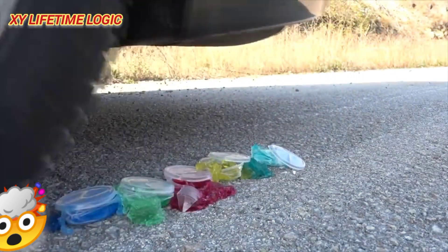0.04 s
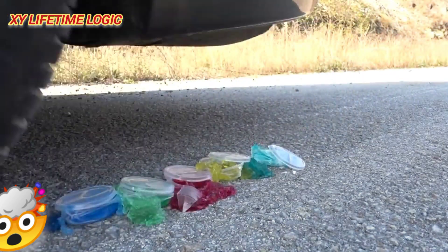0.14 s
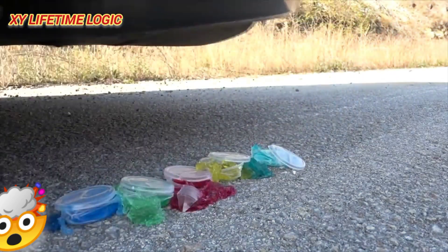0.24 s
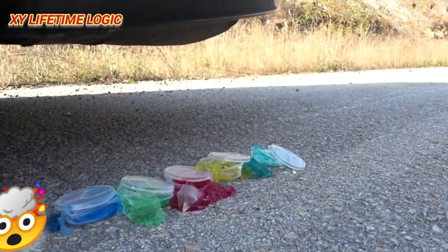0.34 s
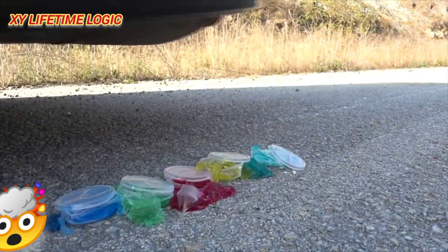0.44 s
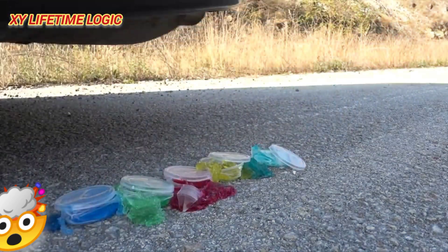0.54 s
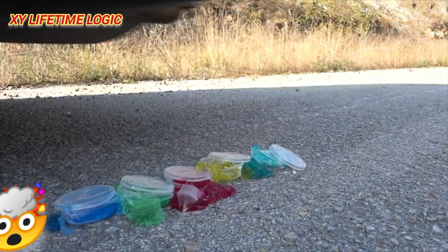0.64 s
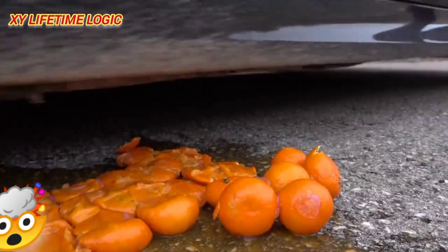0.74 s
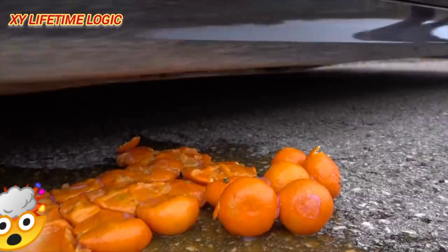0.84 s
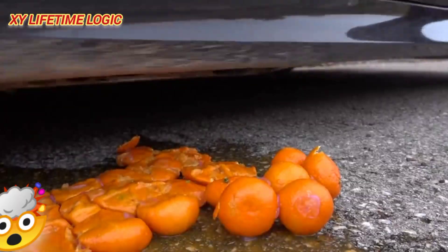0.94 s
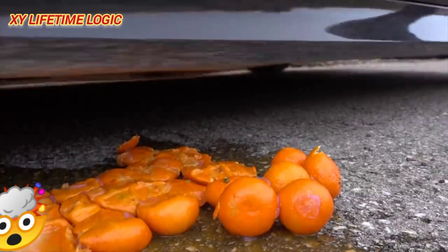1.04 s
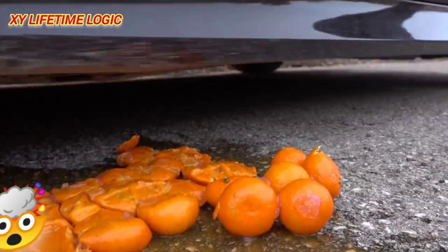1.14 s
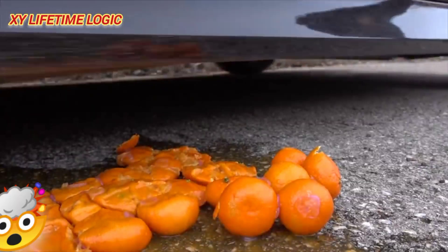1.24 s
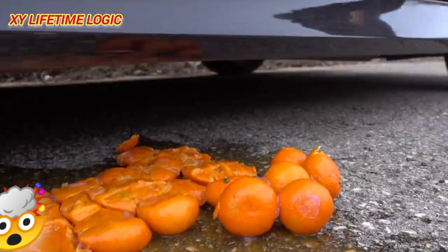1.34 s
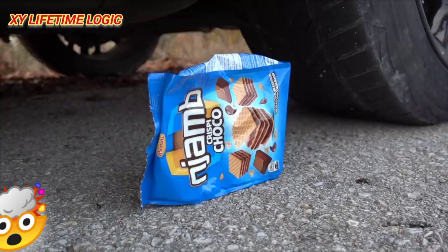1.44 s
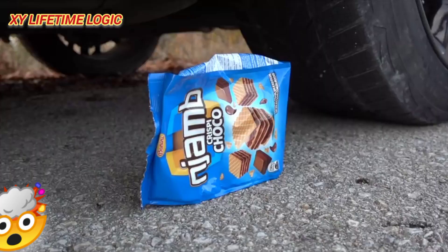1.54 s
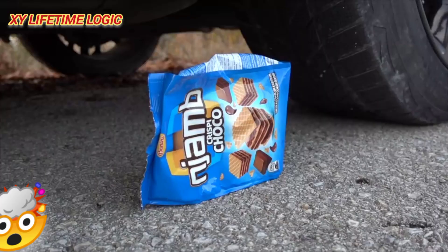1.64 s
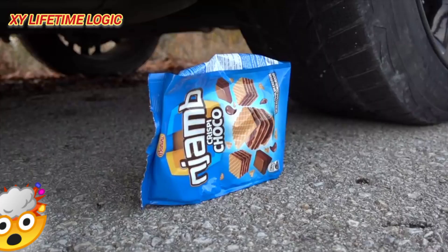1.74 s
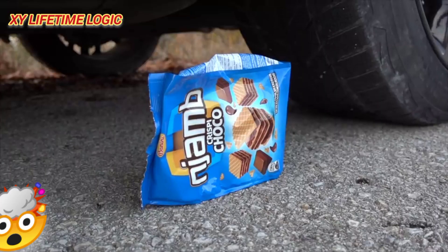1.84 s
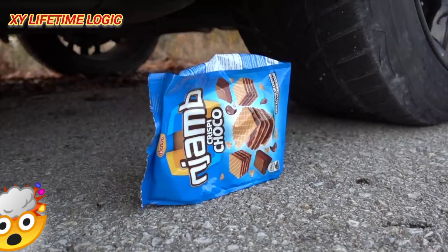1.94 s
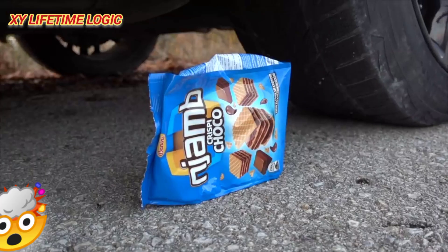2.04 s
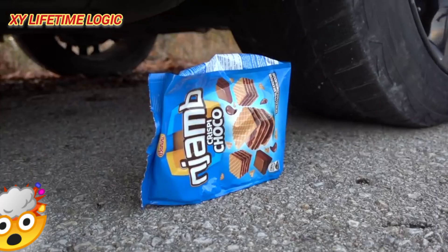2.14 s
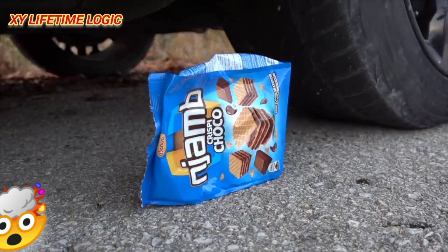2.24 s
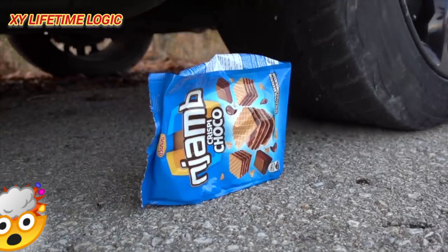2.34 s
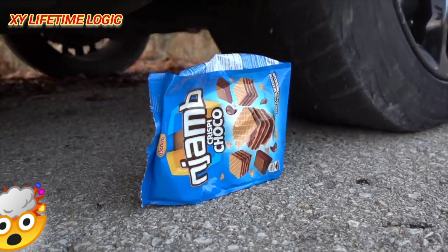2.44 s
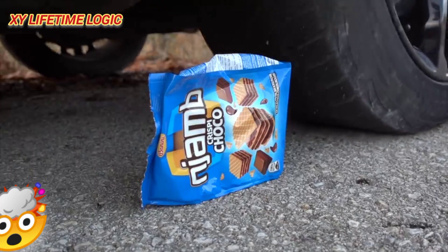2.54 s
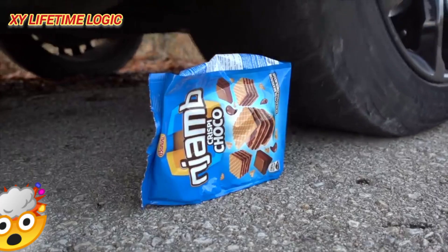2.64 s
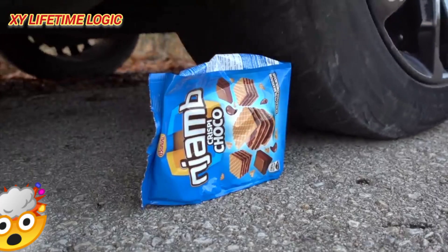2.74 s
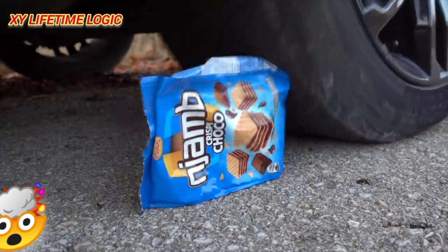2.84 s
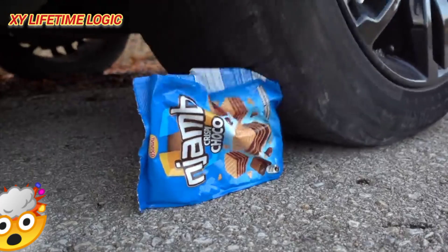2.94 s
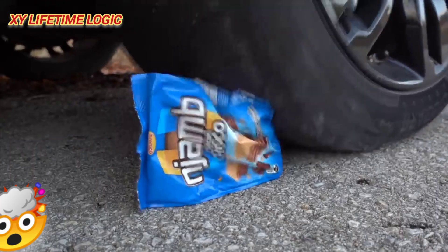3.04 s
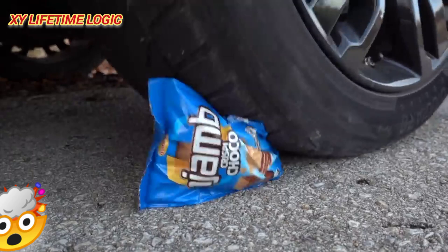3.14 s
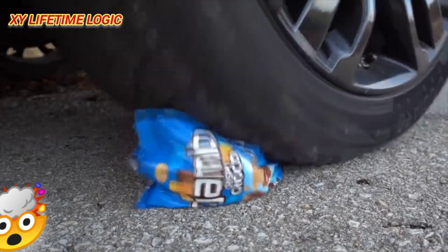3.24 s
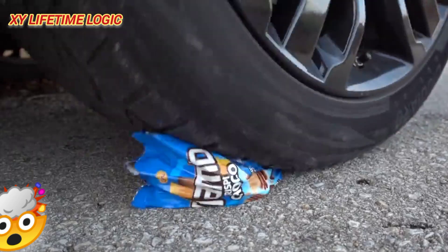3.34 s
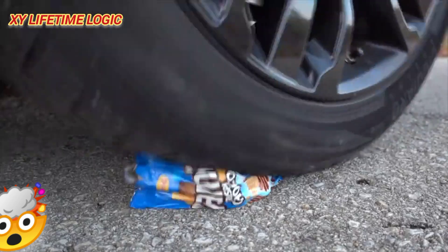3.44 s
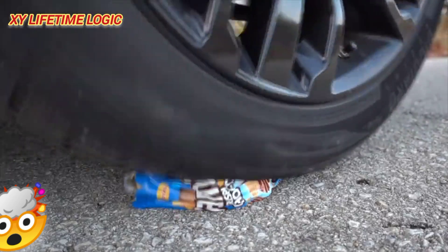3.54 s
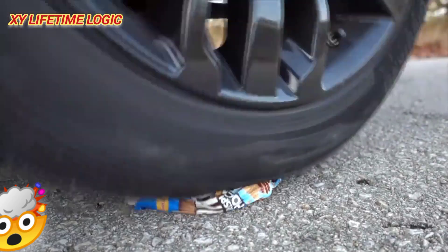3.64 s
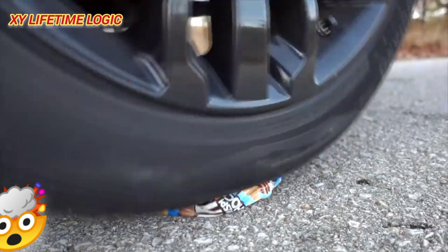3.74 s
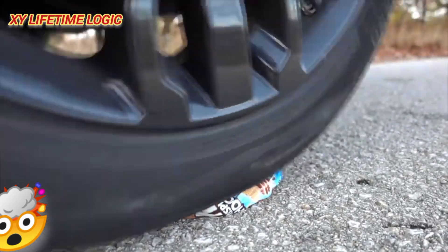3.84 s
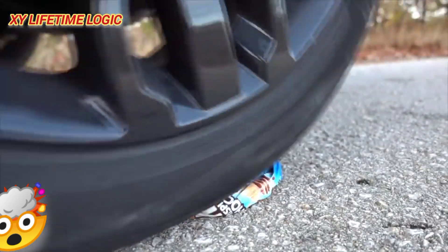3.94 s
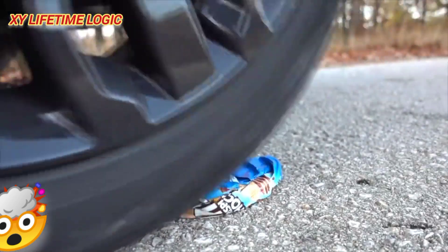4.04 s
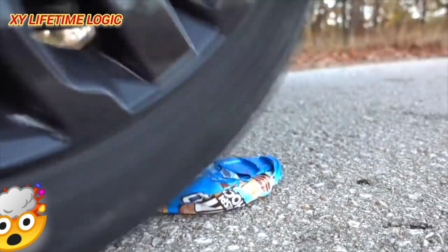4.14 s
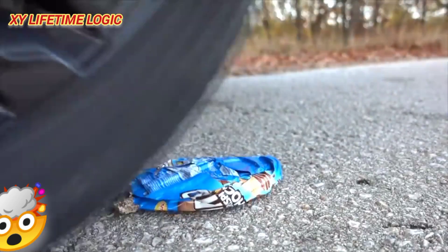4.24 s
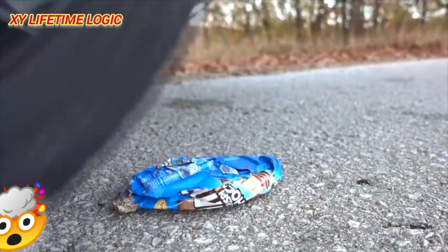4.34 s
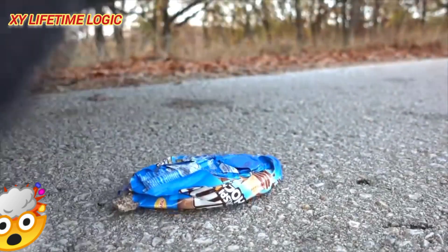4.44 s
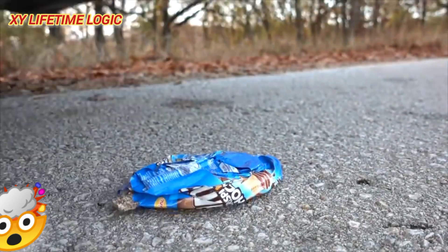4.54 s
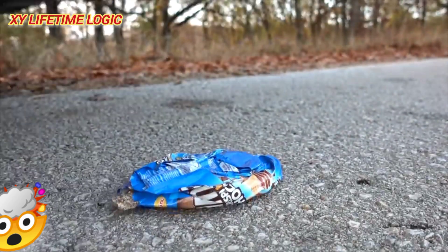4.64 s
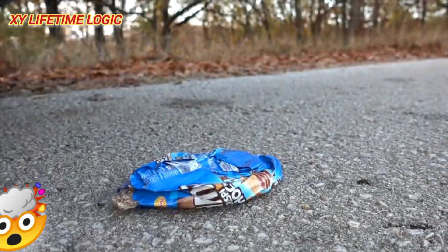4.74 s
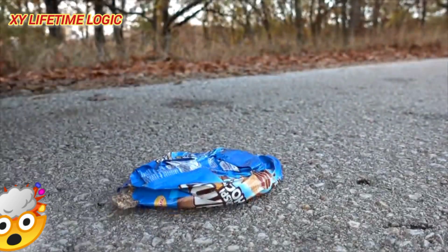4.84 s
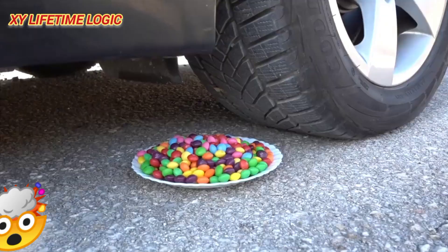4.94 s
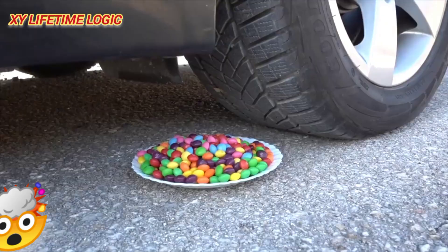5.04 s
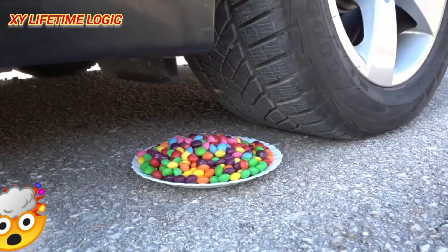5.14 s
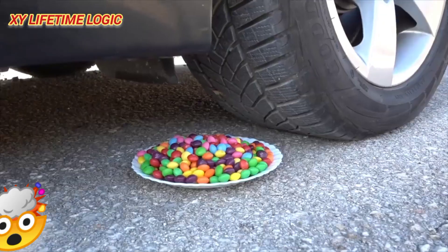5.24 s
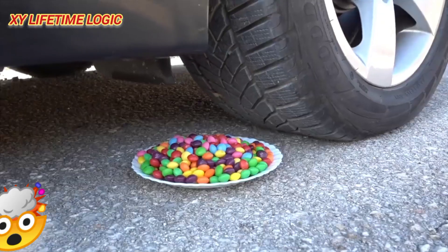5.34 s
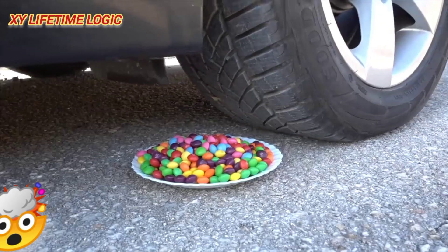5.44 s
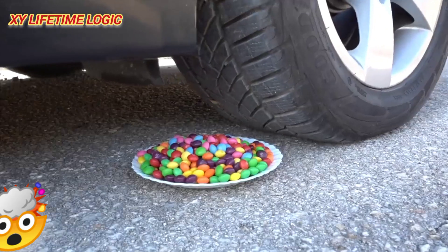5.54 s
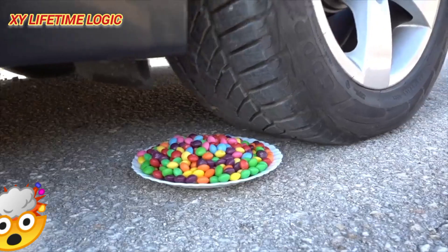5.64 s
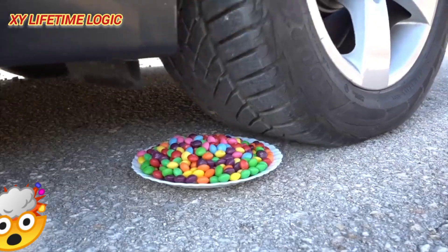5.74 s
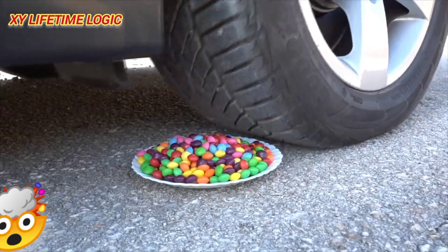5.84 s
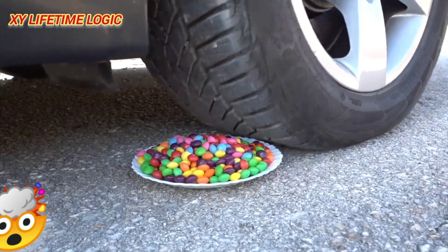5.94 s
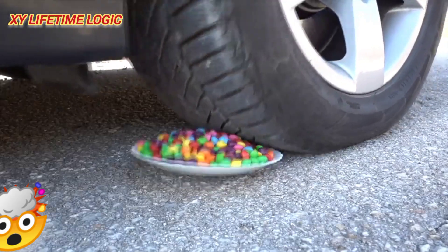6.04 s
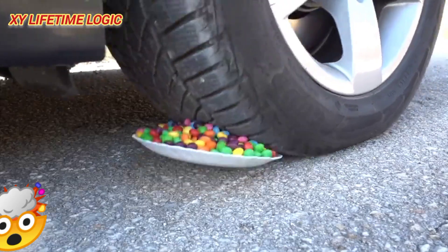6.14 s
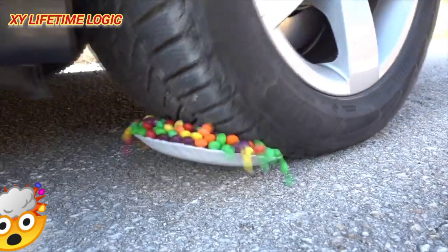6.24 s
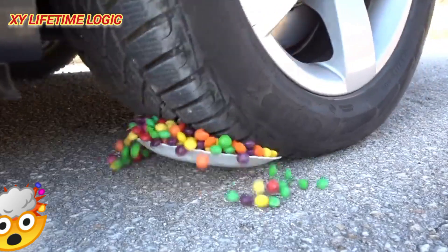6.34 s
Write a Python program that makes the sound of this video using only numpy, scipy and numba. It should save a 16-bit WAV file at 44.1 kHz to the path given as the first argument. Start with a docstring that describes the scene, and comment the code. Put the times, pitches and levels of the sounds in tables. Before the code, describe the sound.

Close to the road, slow tyres creep over grit, brakes scrape and groan, a crisp wafer bag is crushed, its film crackles, and candies burst.

```python
"""A car creeps over small objects on coarse asphalt, heard from the ground.
Tyres grind grit (banded noise) and pop stones (damped tyre modes); the brake lets go with a scrape
(swelling noise) and a groan (gliding sines). A wafer bag is crushed and its film crackles open again
(grainy noise, short rings, ticks). The brake lets go once more, the tyres roll on, and a plate of
sweets starts to shatter, made like the bag."""
import sys
import numpy as np
from scipy import signal
from scipy.fft import rfft, irfft, next_fast_len
from scipy.io import wavfile
from scipy.ndimage import uniform_filter1d
from numba import njit

SR = 44100
rng = np.random.default_rng(int(sys.argv[2]) if len(sys.argv) > 2 else 0)


def pcm_store(signal):
    """Save signal as 16-bit PCM."""
    levels = np.round(np.clip(np.atleast_2d(signal), -1, 1) * 32767)
    wavfile.write(sys.argv[1], SR, levels.astype(np.int16).T)


def attenuation_scalar(level_db):
    """Turn a level in dB into a linear amplitude multiplier (20 dB per decade)."""
    decades = np.asarray(level_db, float) / 20
    return 10 ** decades


N = 282240
TOP_HZ = 15600

# rumble, grind and hiss bands: low_hz, high_hz
BANDS_HZ = [(40, 250), (300, 2500), (4000, 15000)]
# tyre and crush position: time_s, left_minus_right_db
PAN = [(0, 2.5), (.4, 8.5), (.9, 13.5), (1.5, 10.5), (1.85, 14.5), (2.3, 9.5), (2.8, 9.5), (2.9, 3),
       (3.8, 2), (4.05, 7.5), (4.35, 6), (4.9, 12), (5.06, -2), (5.13, -0.5), (5.3, 11.5), (5.9, 6),
       (6.2, 0.5), (6.4, -0.5)]
# phase between the two microphone ports: freq_hz, left_lead_rad
PORT_PHASE = [(30, 0.37), (500, -0.29), (1400, -0.54), (3400, -.01)]
# stretches of rolling: start_s, end_s
ROLL_SPANS_S = [(0, .695), (.695, 1.535), (1.535, 1.81), (1.81, 2.859), (4.947, 5.1), (5.1, 6.18)]
# tyres on grit, one table per stretch: time_s, rumble_db, grind_db, hiss_db
ROLL_LEVELS = [
    [(0.015, -55, -43.5, -60), (0.23, -52.5, -45, -65), (0.5, -53.5, -46.5, -61.5),
     (0.68, -48, -42.5, -60.5)],
    [(0.71, -47, -48.5, -49.5), (0.88, -41.5, -43.5, -48.5), (1.13, -43.5, -47, -56.5),
     (1.316, -43.5, -43, -54), (1.5, -41, -37, -54)],
    [(1.555, -65, -58, -76), (1.7, -48, -69, -64)],
    [(1.92, -62, -48, -63.5), (2.04, -53.5, -53.5, -77), (2.23, -60, -48.5, -77), (2.46, -61.5, -46.5, -69),
     (2.84, -62.5, -40, -58.5)],
    [(4.965, -66, -74, -88), (5.04, -73, -65, -83.5)],
    [(5.31, -45.5, -61.5, -84), (5.566, -60.5, -70, -81), (5.9, -69.5, -60, -82.5),
     (6.11, -61.5, -52.5, -69), (6.17, -58, -57, -52)],
]
# tyre noise spectrum, one table per stretch: freq_hz, density_db_per_hz
ROAD_SPECTRA = [
    [(18, -55), (30, -32), (81, -13.5), (332, -20), (591, -21.5), (639, -18), (787, -23), (1400, -14.5),
     (13300, -19.5), (15500, -37)],
    [(18, -41), (30, -12.5), (237, -6.5), (656, -9.5), (1290, -9.5), (2620, -19), (3400, -18), (5170, -28),
     (12300, -30.5), (15500, -35)],
    [(18, -73), (30, -46), (256, -7), (324, -25), (399, -0.5), (575, -12), (3320, -31), (3880, -30),
     (15500, -41)],
    [(18, -37.5), (30, -10), (92, 7), (152, -1), (420, -4), (830, -17), (1170, -19.5), (1720, -21.5),
     (11900, -26), (15500, -35)],
    [(18, -28), (30, -15), (168, -6), (1720, -20), (2490, -6), (3400, -31), (5040, -23), (5890, -29),
     (15500, -26)],
    [(18, -40), (30, -23), (66, -12.5), (177, -15), (230, -8), (1230, -16.5), (1550, -16), (1680, -21.5),
     (1820, -18.5), (2250, -22), (2650, -18), (3000, -32.5), (15500, -58)],
]
# brake pads scraping free: loudest_s, grind_db, swell_db_per_s, hiss_db, rumble_db
BRAKE_SCRAPES = [(1.812, -35, 155, -58, -37), (5.1, -34.5, 529, -48.5, -34.5)]
# pad noise spectrum, one table per scrape: freq_hz, density_db_per_hz
PAD_SPECTRA = [
    [(18, -56), (30, -36), (123, -12), (213, -26), (324, -7.5), (575, -20.5), (691, -10.5), (1140, -21.5),
     (2990, -5.5), (15500, -15)],
    [(18, -51), (30, -30), (359, -9), (432, -2.5), (1050, -5.5), (1260, -2.5), (3680, -8.5), (10500, -28),
     (11900, -77), (15500, -42)],
]
# pad squeaks and body groans: start_s, level_db, start_hz, end_hz, rise_s, t60_s
GROANS = [(1.704, -35, 130, 121, 0.0052, 0.094), (1.725, -47, 1500, 1500, .02, .1),
          (1.791, -35, 379, 339, 0.052, 0.14), (1.82, -42.5, 1450, 1450, 0.018, 0.15),
          (1.848, -33.5, 330, 128.5, 0.0082, 0.29), (1.901, -49.5, 395, 384.5, 0.048, 1.3),
          (5.078, -34, 470, 440, .008, .12), (5.114, -26, 266, 140.6, 0.028, 0.1),
          (5.224, -36.5, 151, 132, 0.01, 0.53)]
# tyre and wheel arch modes: mode_hz, level_db, relative_ring_time
TYRE_MODES = [(237.4, -6, 1.44), (330, -9, 3.3), (461, -0.5, 1.14), (541, 1, 0.88), (664, 4, 0.65),
              (789, 1, 0.48), (904, 4, 0.92), (1074, 4.5, 0.39), (1214, 0.5, 0.69), (1450, 7.5, 0.35),
              (1624, -3, .8), (1963, -5, 2.1), (2350, -11.5, 0.85), (2610, -5, 1.95), (2900, 0.5, 0.62),
              (3490, -13.5, 0.58), (3850, -7.5, 1), (4160, -9.5, 0.36)]
# stones and lumps popping under the tread: start_s, level_db, centre_hz, thud_db, crack_db
KNOCKS = [(0.041, -28, 620, -2.5, -9), (0.18, -27.5, 611, -28, 4.5), (0.453, -25, 487, -17, -16),
          (0.569, -25.5, 1620, -33, -26), (0.585, -31.5, 930, -18, -15), (0.607, -30.5, 2330, -7, -5.5),
          (0.753, -16.5, 910, 2, -8.5), (0.793, -16.5, 886, 2, 1), (1.116, -32.5, 415, 6.5, -6),
          (1.174, -33, 1510, -16, -18), (1.23, -18.5, 1590, -4, -24), (1.249, -33, 420, -1, -6),
          (1.345, -35, 401, -16, -13), (1.645, -43, 524, -20, -8.5), (2.123, -42, 423, -24, -12.5),
          (2.247, -33, 643, -32, -15), (2.333, -20, 704, -36, -21), (2.406, -38, 681, 2, -19),
          (2.466, -29, 587, -27, -20), (2.596, -39.5, 535, -23, -8), (2.613, -38, 444, -15, -6.5),
          (2.672, -41, 697, -20, -11), (2.75, -28, 860, -18, -28), (2.757, -30.5, 980, -17, -24),
          (2.797, -43, 452, -24, -5), (2.865, -28.5, 956, 3, -2), (3.077, -16, 697, -30, -17),
          (3.11, -19.5, 554, -27, -1), (3.188, -20.5, 1310, -18.5, -23), (3.209, -14, 506, -26, -10),
          (3.264, -16.5, 1640, -25, 1), (3.282, -12.5, 525, -25, -15), (3.325, -10, 517, -7.5, -9),
          (3.4, -16, 650, -28, -14), (3.481, -14, 1530, -12, -21), (3.855, -12, 870, -16, -33),
          (4.0505, -11.5, 660, -45, -35), (4.573, -31.5, 1590, -9, -11), (4.691, -31, 900, -17, 0),
          (5.048, -50, 1700, -20, -8), (5.188, -44, 3000, -20, 0), (5.815, -44.5, 470, -5, -9),
          (5.953, -53, 458, 10, -16), (6.113, -42.5, 1000, -21, 6)]
# spectra of bag, film and sweets: freq_hz, density_db_per_hz
SHARD_SPECTRA = [
    [(18, -48.5), (30, -36), (88, -11), (197, -4.5), (237, -6), (277, -3.5), (546, -3.5), (1170, -9.5),
     (1290, -6), (1720, -7), (2990, -2), (11000, -1.5), (15500, -4)],
    [(18, -44), (30, -5), (177, 4.5), (359, -3), (673, -3.5), (767, -6), (852, -1), (945, -8), (3230, -4),
     (3490, -5), (13600, -4), (15500, -5)],
    [(18, -58), (30, -23), (187, -13), (243, -3), (341, -18), (656, -4), (897, -16.5), (1170, -0.5),
     (1440, -10), (6720, -4.5), (15500, -15.5)],
]
# bag being crushed: time_s, rumble_db, grind_db, hiss_db
BAG_LEVELS = [(2.87, -37, -26.5, -29.5), (2.93, -43.5, -28, -24.5), (3.06, -40, -27, -24.5),
              (3.25, -47, -18.5, -22), (3.34, -30.5, -23, -25.5), (3.42, -44, -24.5, -23),
              (3.55, -49.5, -29.5, -25), (3.8, -53, -32, -26), (3.9, -47, -41, -33),
              (3.98, -59, -32.5, -32.5), (4.029, -52, -37, -42)]
# film unfolding: time_s, rumble_db, grind_db, hiss_db
FILM_LEVELS = [(4.031, -55, -38, -44.5), (4.14, -50.5, -42, -49), (4.35, -52.5, -40.5, -43.5),
               (4.5, -50.5, -44.5, -46), (4.62, -50, -42.5, -51.5), (4.76, -49, -35, -53.5),
               (4.934, -48.5, -35.5, -52.5)]
# sweets breaking: time_s, rumble_db, grind_db, hiss_db
SWEETS_LEVELS = [(6.18, -55, -45, -52), (6.192, -55, -42, -47), (6.198, -52, -37, -32),
                 (6.216, -45, -35, -29.5), (6.226, -48, -32.5, -23.5), (6.25, -46.5, -31, -18),
                 (6.33, -51, -27, -20.5), (6.37, -50, -33, -20.5), (6.383, -58, -36, -25),
                 (6.4, -53, -38, -25.5)]
# clearest brittle snaps: start_s, level_db, centre_hz, left_minus_right_db
SNAPS = [(0.0064, -19.5, 1570, 4), (0.3128, -14.5, 4720, 3.5), (0.4981, -10, 7630, 8),
         (0.5695, -32, 2480, 5), (0.6462, -26.5, 2580, 6), (1.2315, -24, 1940, 9), (2.334, -37, 1420, 3),
         (0.6958, -36, 2080, 2), (2.599, -41, 1700, 23), (2.797, -34, 1520, 9), (2.8629, -10, 4730, 6),
         (2.9504, -10, 2800, 1), (3.0354, -2.5, 3270, -3), (3.0594, -11, 4000, -3), (3.0769, -8, 3500, -4),
         (3.1325, 0.5, 2550, 1), (3.5263, -9, 3400, 4), (3.5566, -9, 7100, 2), (3.582, -3, 5540, 3),
         (3.6044, -12, 6500, -1), (3.7978, -6, 9100, -2), (3.7757, -12, 2500, 0), (3.8062, -21, 3000, -1),
         (3.8331, -21, 4690, 2), (3.882, -6, 2687, -2), (3.928, -4.5, 1880, -3), (3.9614, -21, 5100, 0),
         (3.9788, -12.5, 2110, -4), (4.0978, -13, 2970, 4), (4.1296, -25, 2460, -4),
         (4.1608, -14.5, 4320, 2), (4.174, -14.5, 3530, -1), (4.2116, -19, 3700, 2),
         (4.2288, -18.5, 2410, -1), (4.2721, -6, 4700, 2.5), (4.3012, -23, 7070, 1.5),
         (4.3127, -20, 4380, -3), (4.3438, -10.5, 3760, 1), (4.3743, -7, 4680, 3.5),
         (4.4135, -15.5, 3430, 6), (4.5167, -30, 10800, -1), (4.5811, -22, 4760, 6),
         (4.5541, -17.5, 2900, 9), (4.5903, -21, 4430, -14), (4.615, -25, 2900, -6),
         (4.626, -22.5, 2060, 7), (4.6522, -19, 3280, 5), (4.6629, -19.5, 3880, 6), (4.689, -11.5, 2130, 6),
         (4.7278, -20, 3000, 10), (4.738, -25, 8000, 3), (4.7895, -15.5, 4500, 19), (4.8127, -7, 3380, 5),
         (4.835, -22, 3200, 8), (4.9047, -14, 4500, 6.5), (4.938, -24.5, 7700, 12),
         (6.0207, -35.5, 8000, 4), (6.098, -22.5, 3250, 1), (6.1304, -26, 4500, -2),
         (6.139, -17.5, 5150, -5), (6.2053, -8.5, 6720, -1), (6.2485, -5, 7250, 3), (6.2803, -2, 7100, 0.5),
         (6.327, -2, 5460, -2), (6.3356, 0, 6000, 0), (6.3648, -2, 5010, 2), (6.3891, 1.5, 7600, 0)]


def on_log_hz(table, hz):
    """Second column of a table at hz, interpolated over log frequency."""
    table_hz, value = np.transpose(table)
    return np.interp(np.log(np.maximum(hz, 1)), np.log(table_hz), value)


def tyre_pan(s):
    """Left minus right dB at the tyre at time s."""
    return np.interp(s, *np.transpose(PAN))


def sides(pan_db, hz):
    """Left and right gains; bass and top treble reach both ports alike."""
    db = pan_db * np.clip(hz / 1700.0, 0, 1) * np.clip(1.5 - hz / 6400.0, 0, 1) / 2
    return attenuation_scalar(db), attenuation_scalar(-db)


@njit
def ring(count, start, hz, t60, rise, left, right):
    """Sum of damped sines that swell over the contact time, each dropped at -60 dB."""
    out = np.zeros((2, count))
    for k in range(len(start)):
        turn = np.exp(2j * np.pi * hz[k] / SR - np.log(1000.) / (t60[k] * SR))
        z, gap, close = 1 + 0j, 1., np.exp(-1 / (rise[k] * SR))
        for i in range(start[k], min(count, start[k] + int(t60[k] * SR) + 2)):
            v = z.imag * (1 - gap) ** 2
            out[0, i] += left[k] * v
            out[1, i] += right[k] * v
            z *= turn
            gap *= close
    return out


def ring_panned(s, hz, t60_s, rise_s, size, pan_db):
    """Damped sines of any array shape, placed left to right."""
    left, right = sides(pan_db, hz)
    start = (s * SR).astype(np.int64)
    return ring(N, start.ravel(), hz.ravel(), t60_s.ravel(), rise_s.ravel(),
                (size * left).ravel(), (size * right).ravel())


def walk(n, rate_hz):
    """Random levels held 1 / rate_hz and slewed; spread near 1."""
    k = max(int(SR / rate_hz), 1)
    held = np.repeat(rng.standard_normal(n // k + 1), k)
    return 1.05 * uniform_filter1d(held, k)[:n]


def clatter(n, rate_hz, spread_db, tail_s):
    """Power envelope of random little breaks with sharp starts and short tails, mean 1."""
    chance = rng.random((2, n))
    kicks = (chance[0] < rate_hz / SR) * attenuation_scalar(-2 * spread_db * np.log(1 - chance[1]))
    power = signal.lfilter([1], [1, -np.exp(-1 / (tail_s * SR))], kicks) + 1e-18
    return power / power.mean()


def stretch(span_s, levels, spectrum, grit, rate_hz, spread_db, flicker_db, wide_hz):
    """Half-octave noise, part smooth, part grains (share: grit); three levels bend the spectrum."""
    s, *columns = np.transpose(levels)
    i0, i1 = int(span_s[0] * SR), min(int(span_s[1] * SR), N)
    n, size = i1 - i0, next_fast_len(i1 - i0)
    t = np.arange(i0, i1) / SR
    pan_db = tyre_pan(t)
    f = np.arange(size // 2 + 1) * SR / size
    shape = attenuation_scalar(on_log_hz(spectrum, f))
    bend_db = []
    for column, (lo, hi) in zip(columns, BANDS_HZ):
        power = np.sum(shape[(f > lo) & (f < hi)] ** 2) / len(f)
        bend_db.append(np.interp(t, s, column) - 10 * np.log10(power))
    whole, swell = clatter(n, rate_hz, spread_db, 0.00066), walk(n, 24.37)
    out = np.zeros((2, N))
    for hz in 30 * 2 ** np.arange(0, 9.6, .5):
        window = np.cos(np.pi * np.clip(np.log2(np.maximum(f, 1) / hz), -.5, .5))
        noise = rfft(rng.standard_normal((2, size)))
        mid, side = irfft(noise * shape * window, size)[:, :n]
        place = np.interp(np.log(hz), np.log([130, 900, 7000]), [0, 1, 2])
        db = sum(max(1 - abs(place - k), 0) * bend_db[k] for k in range(3))
        # some breaks cover all pitches, some ring at one pitch for a few cycles
        grains = .5 * whole + .5 * clatter(n, rate_hz / 2, spread_db, 1.5 / hz + 0.0016)
        grains = uniform_filter1d(grains, int(SR / hz) + 1)
        flicker = flicker_db * (swell + walk(n, 40.25))
        gain = attenuation_scalar(db + flicker) * np.sqrt(1 - grit + grit * grains)
        wide = min(.04 + hz / wide_hz, .74)
        left, right = sides(pan_db, hz)
        out[0, i0:i1] += gain * left * (mid + wide * side)
        out[1, i0:i1] += gain * right * (mid - wide * side)
    return out


def underbody(x, wet_db, t60_s):
    """Small sources radiate little deep bass; short scatter between road and car floor follows."""
    x = signal.sosfilt(signal.butter(2, 150., "high", fs=SR, output="sos"), x)
    t = np.arange(int(.12 * SR)) / SR
    shared = rng.standard_normal(len(t))
    own = signal.lfilter([1, -.9], [1], rng.standard_normal((2, len(t))))
    tail = (shared + .5 * own) * np.exp(-np.log(1000) * t / t60_s) * (t > .001)
    tail = tail / np.sqrt(np.sum(tail ** 2, axis=1, keepdims=True))
    return x + attenuation_scalar(wet_db) * signal.fftconvolve(x, tail, axes=1)[:, :N]


def hiss():
    """Faint even noise, slightly dull, independent left and right."""
    return signal.lfilter([attenuation_scalar(-63)], [1, -.4], rng.standard_normal((2, N)))


def tyres():
    """Grit grinding under slowly turning tyres: flickering noise, half of it grains."""
    return sum(stretch(span, levels, spectrum, grit=0.49, rate_hz=250.0, spread_db=2.0,
                       flicker_db=.8, wide_hz=7700.0)
               for span, levels, spectrum in zip(ROLL_SPANS_S, ROLL_LEVELS, ROAD_SPECTRA))


def peak_db(t, at_s, top_db, swell_db_per_s, fade_db_per_s):
    """Level that swells to a 15 ms hold around at_s and fades, at steady dB rates."""
    slope = np.where(t < at_s, swell_db_per_s, fade_db_per_s)
    return top_db - slope * np.maximum(abs(t - at_s) - 0.015 / 2, 0)


def brake_scrape():
    """Pads scrape loose, swelling, holding and fading; a rumble peaks as the body settles."""
    out = np.zeros((2, N))
    for (s, grind_db, swell, hiss_db, rumble_db), spectrum in zip(BRAKE_SCRAPES, PAD_SPECTRA):
        t = np.arange(s - .15, s + .3, .002)
        rumble = peak_db(t, s + 0.051, rumble_db, 213, 107)
        grind = peak_db(t, s, grind_db, swell, 316)
        hissing = peak_db(t, s, hiss_db, swell, 500.)
        levels = np.transpose([t, rumble, grind, hissing])
        out += stretch((t[0], t[-1]), levels, spectrum, grit=0.17, rate_hz=240.0, spread_db=4.0,
                       flicker_db=.8, wide_hz=8600.0)
    return out


def brake_groans():
    """Pads squeak and the body groans on its springs: damped sines, most gliding down."""
    out = np.zeros((2, N))
    t = np.arange(int(.4 * SR)) / SR
    for s, db, start_hz, end_hz, rise_s, t60_s in GROANS:
        hz = end_hz + (start_hz - end_hz) * np.exp(-t / 0.013)
        decay = np.exp(-np.log(1000) * np.maximum(t - rise_s, 0) / t60_s)
        swing = decay * np.minimum(t / rise_s, 1)
        tone = np.sin(2 * np.pi * np.cumsum(hz) / SR)
        out[:, int(s * SR):int(s * SR) + len(t)] += attenuation_scalar(db) * swing * tone
    return out


def knocks():
    """Each pop is three blows ringing tyre modes near its centre, the carcass below, the crack above."""
    s, db, centre_hz, thud_db, crack_db = np.transpose(KNOCKS)[:, :, None, None]
    mode_hz, mode_db, ring_time = np.transpose(TYRE_MODES)
    chance = rng.random((len(KNOCKS), 3, 3, len(TYRE_MODES)))
    near = attenuation_scalar(-8. * np.log2(mode_hz / centre_hz) ** 2)
    thud = attenuation_scalar(thud_db + 10.5) * (mode_hz < 300)
    crack = attenuation_scalar(crack_db + 2.5) * (mode_hz > 1600)
    blow = np.arange(3)[:, None]
    # later blows are weaker and duller, with random polarity
    size = attenuation_scalar(db + mode_db - 6.0) * (near + thud + crack) * attenuation_scalar(-blow * (7. + mode_hz / 400.))
    size = size * np.where(blow > 0, np.sign(chance[:, 2] - .5), 1)
    hz = mode_hz * (1 + 0.24 * (chance[:, 0] - .5))
    start_s = s + .0009 * chance[:, 1] + .006 * blow * (.5 + chance[:, 1, :, :1])
    # rubber damps the high modes sooner
    t60_s = 0.055 * ring_time * np.minimum(800 / hz, 1)
    return ring_panned(start_s, hz, t60_s, 0.17 / hz, size, tyre_pan(s) + 1.)


def film_noise():
    """The bag's film rustles as it unfolds: noise, half of it grains."""
    return stretch((4.03, 4.947), FILM_LEVELS, SHARD_SPECTRA[1], grit=.5, rate_hz=500., spread_db=2.,
                   flicker_db=.5, wide_hz=8500.)


def bag_noise():
    """Wafers and film break densely: noise, nearly all of it grains."""
    return stretch((2.859, 4.03), BAG_LEVELS, SHARD_SPECTRA[0], grit=0.89, rate_hz=650.0, spread_db=1.5,
                   flicker_db=.8, wide_hz=8400.0)


def sweets_noise():
    """Sugar shells shatter: noise, half of it grains."""
    return stretch((6.18, 6.4), SWEETS_LEVELS, SHARD_SPECTRA[2], grit=0.52, rate_hz=570.0, spread_db=2.5,
                   flicker_db=.8, wide_hz=9300.0)


def tick(s, db, hz, pan_db):
    """A bare tick: a break so short (t60 of 3 cycles) that it covers a wide range of pitch."""
    return ring_panned(s, hz, 3. / hz, 0.096 / hz, attenuation_scalar(db), pan_db)


def snaps(rows, octaves, splinter_s, count):
    """A snap is a cluster of few-cycle rings around its centre, most at once, some splintering later."""
    s, db, centre_hz, pan_db = np.transpose(rows)[:, :, None]
    chance = rng.random((len(rows), 3, count))
    place = (np.arange(count) + chance[:, 0]) / count - .35
    hz = np.clip(centre_hz * 2 ** (octaves * place), 400, TOP_HZ)
    late = chance[:, 1] ** 4
    size = attenuation_scalar(db - 10. * late - 2.24 * np.log2(hz / centre_hz) ** 2) * (hz < TOP_HZ)
    start_s = s + .0004 + splinter_s * late
    t60_s = np.minimum(2.59 / hz + 0.0017, .006)
    return ring_panned(start_s, hz, t60_s, 0.00015 + 0.46 / hz, size, pan_db + 3.3 * (chance[:, 2] - .5))


def small_breaks(levels, rate_hz, over_db, spread_db):
    """Random times, levels that follow the hiss of the crush, and two more random columns."""
    s, *_, hiss_db = np.transpose(levels)
    chance = rng.random((int((s[-1] - s[0]) * rate_hz), 4))
    t = s[0] + (s[-1] - s[0]) * chance[:, 0]
    db = np.interp(t, s, hiss_db) + over_db - spread_db * np.log(1 - .97 * chance[:, 1])
    return t, db, chance[:, 2], chance[:, 3]


def ticks(levels, rate_hz, over_db, spread_db):
    """Random bare ticks, each with its own brightness."""
    t, db, bright, place = small_breaks(levels, rate_hz, over_db, spread_db)
    return tick(t, db, 2520.0 * 2 ** (2.33 * bright), tyre_pan(t) + 6.3 * (place - .5))


def crackle(levels, rate_hz, over_db, spread_db):
    """Many small snaps of all colours."""
    t, db, bright, place = small_breaks(levels, rate_hz, over_db, spread_db)
    rows = np.transpose([t, db, 822.0 * 2 ** (3.21 * bright), tyre_pan(t) + 2.7 * (place - .5)])
    return snaps(rows, octaves=1.76, splinter_s=.001, count=6)


def brittle():
    """Single snaps, each starting with a tick, over the small breaks of bag, film and sweets."""
    small = crackle(BAG_LEVELS, 450., 8.3, 3.96) + ticks(BAG_LEVELS, 150., 16., 4.2)
    small += crackle(FILM_LEVELS, 110.0, 15.6, 3.7) + ticks(FILM_LEVELS, 60., 16., 4.5)
    small += crackle(SWEETS_LEVELS, 400., 3.9, 3.3) + ticks(SWEETS_LEVELS, 150., 13., 4.)
    s, db, hz, pan_db = np.transpose(SNAPS)
    starts = tick(s + 0.00046, db + 0.5, hz, pan_db)
    return small + starts + snaps(SNAPS, octaves=3.25, splinter_s=.0018, count=14)


def scene():
    """Steady textures plus single breaks with their scatter, over faint even hiss."""
    car = tyres() + brake_scrape() + brake_groans() + underbody(knocks(), wet_db=-4.0, t60_s=0.098)
    crush = film_noise() + bag_noise() + sweets_noise()
    return hiss() + car + crush + underbody(brittle(), wet_db=-6.0, t60_s=0.028)


def ports(x):
    """Turn the left channel's phase against the right, as the two ports differ."""
    size = next_fast_len(N)
    f = np.maximum(np.arange(size // 2 + 1) * SR / size, 1)
    turn = np.exp(.5j * on_log_hz(PORT_PHASE, f) * np.array([[1], [-1]]))
    return irfft(rfft(x, size) * turn, size)[:, :N]


def low_pass(x):
    """Removes everything above the highest recorded frequency."""
    return signal.sosfilt(signal.butter(12, 16660, fs=SR, output="sos"), x)


def record(dry):
    """Port phase, then the loudest peaks are rounded and the top is cut."""
    rounded = 0.75 * np.tanh(ports(dry) / 0.85)
    top_cut = signal.ellip(8, .2, 60, TOP_HZ, fs=SR, output="sos")
    return low_pass(signal.sosfilt(top_cut, rounded))


dry = scene()
out = record(dry)
pcm_store(out)
```